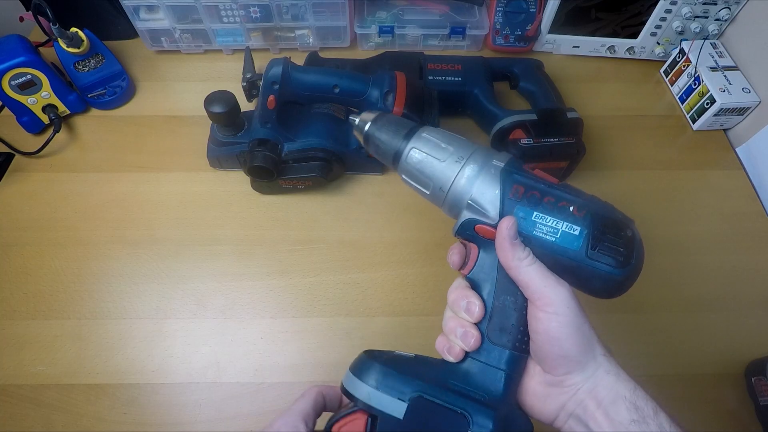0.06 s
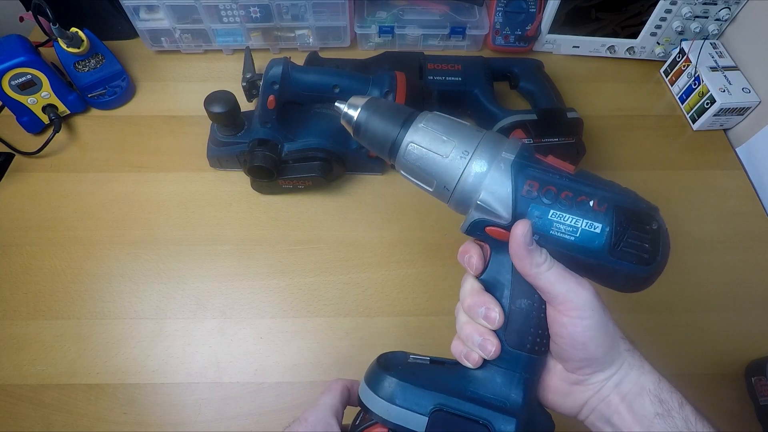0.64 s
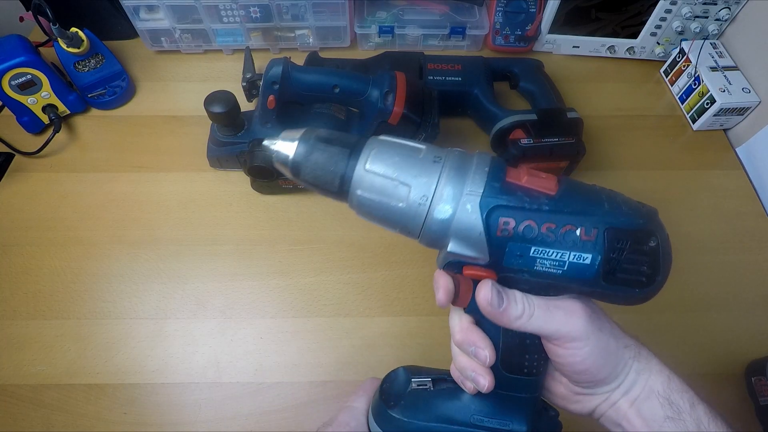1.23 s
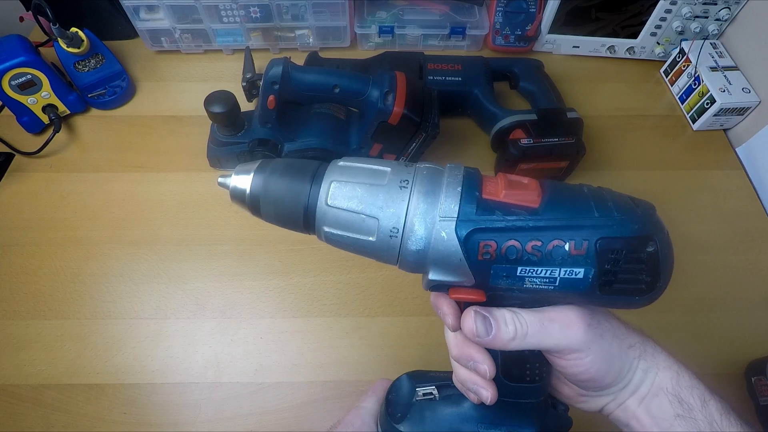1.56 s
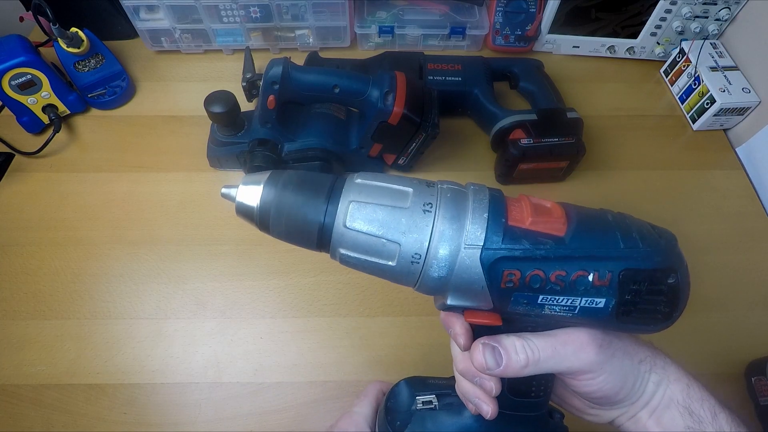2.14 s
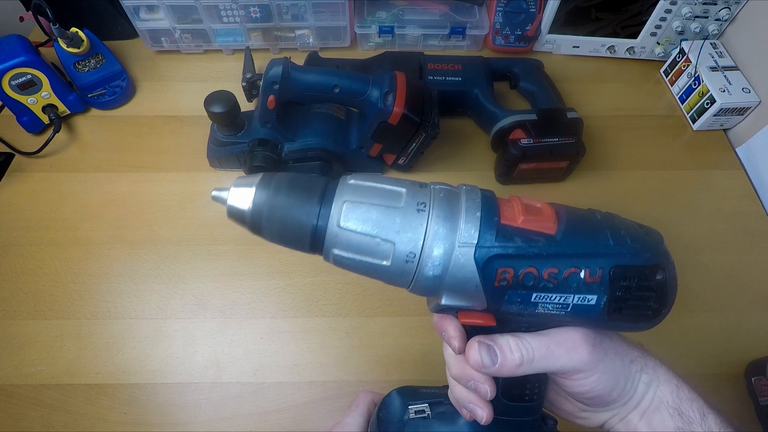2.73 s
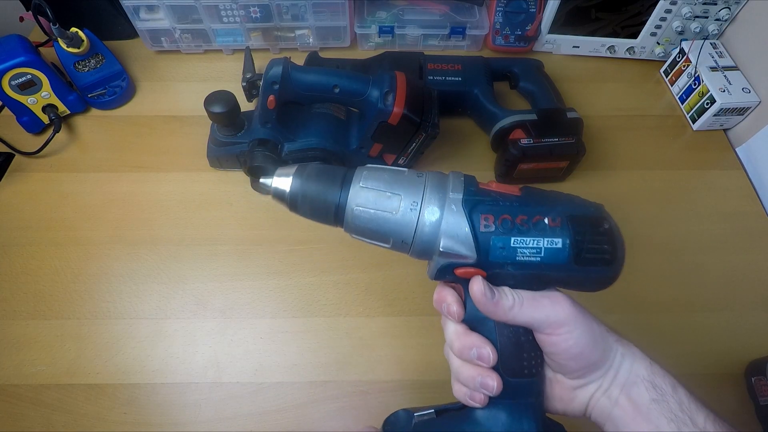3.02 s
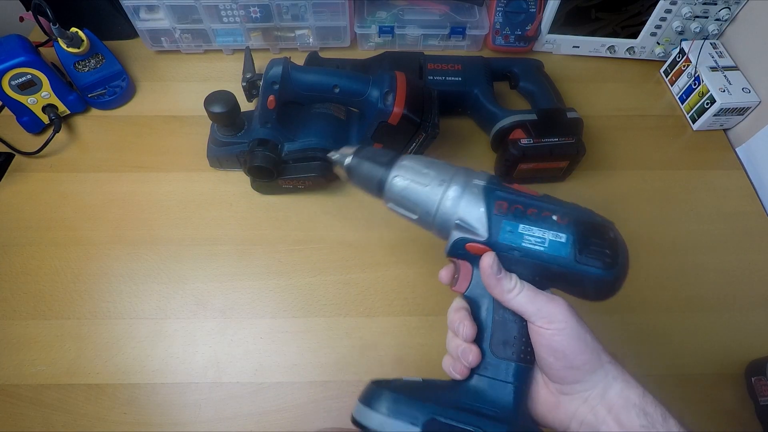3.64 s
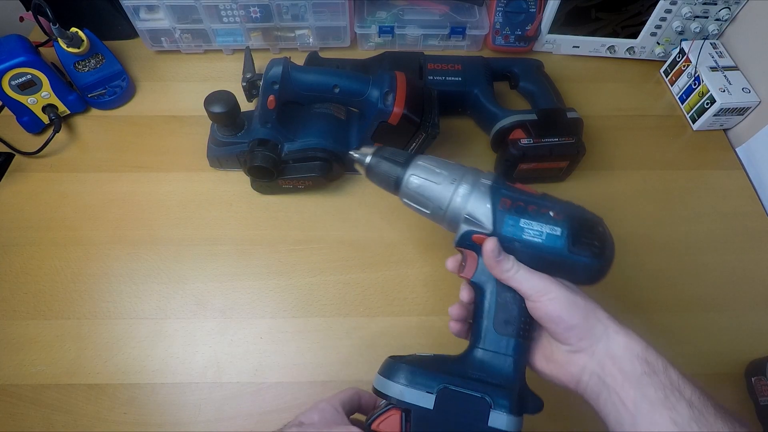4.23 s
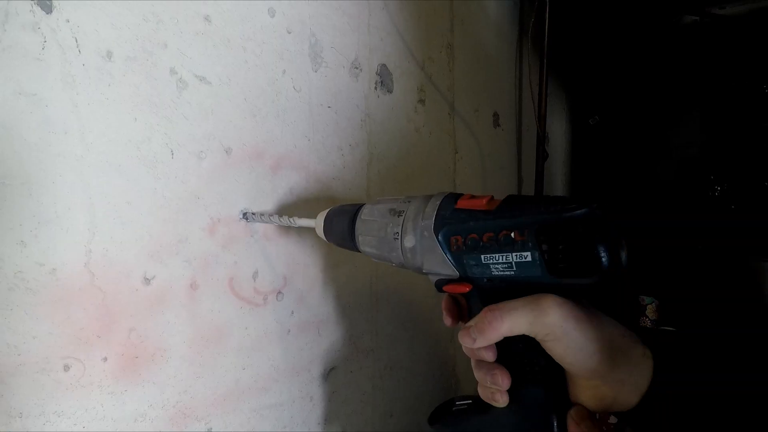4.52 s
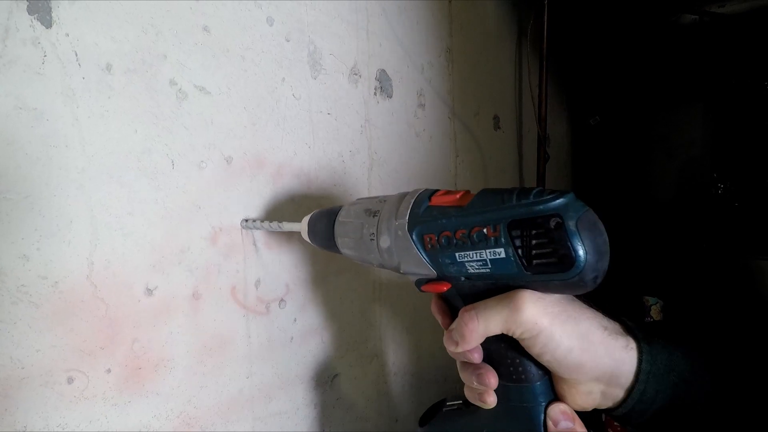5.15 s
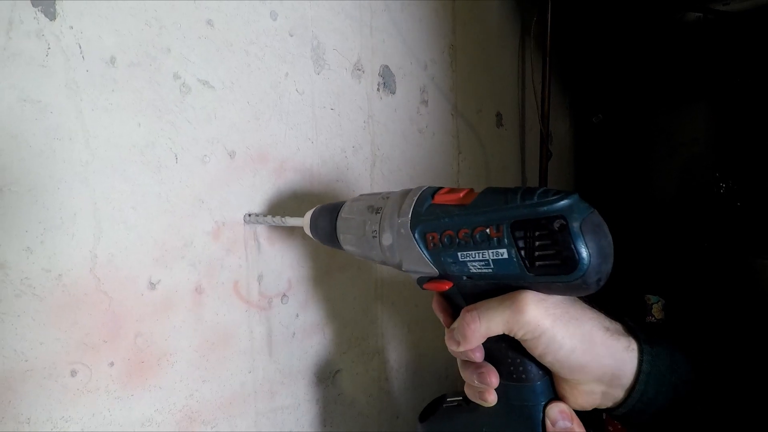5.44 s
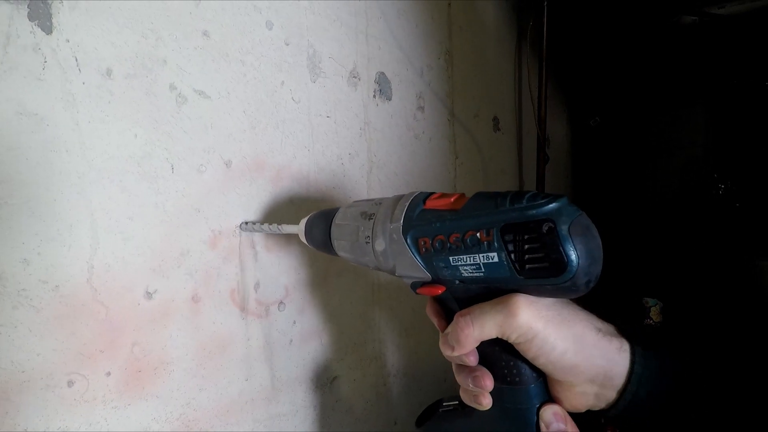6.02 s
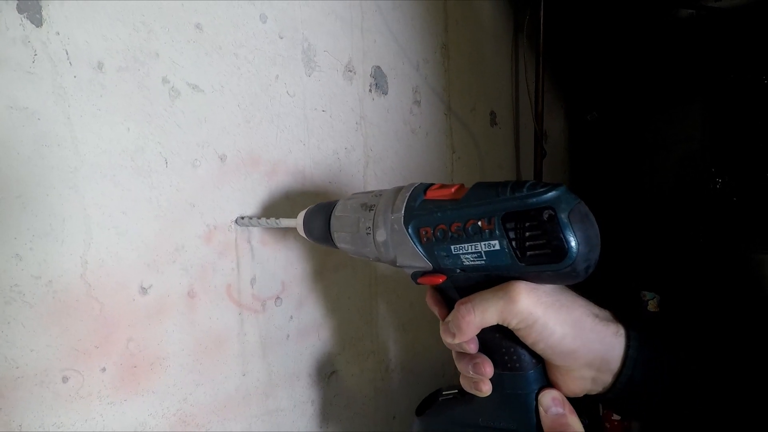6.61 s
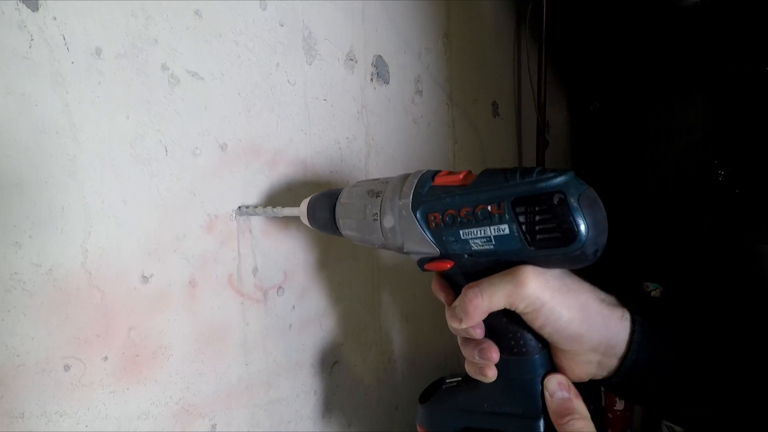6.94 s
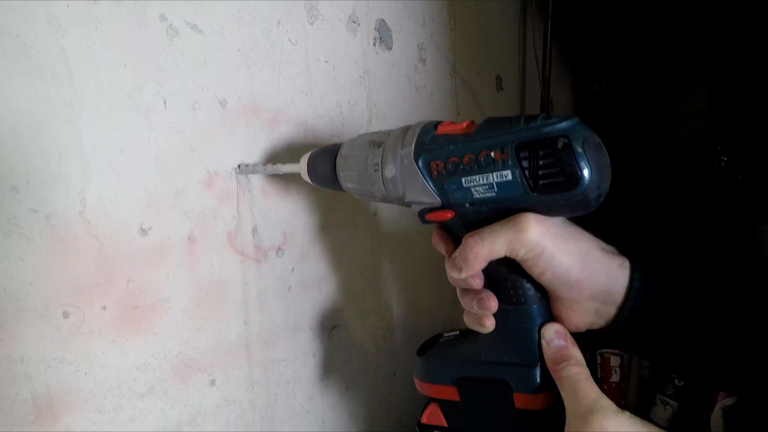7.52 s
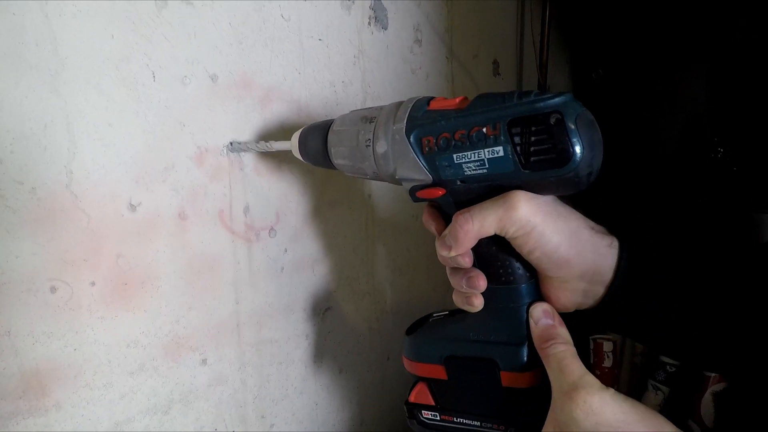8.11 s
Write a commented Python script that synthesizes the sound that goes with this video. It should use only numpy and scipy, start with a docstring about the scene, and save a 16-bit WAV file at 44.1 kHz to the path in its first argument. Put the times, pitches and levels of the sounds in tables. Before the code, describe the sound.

In a small workshop, a cordless drill runs free twice, clacking to a stop, then bores into concrete in hammer mode.

```python
"""A cordless drill growls at a crawl, whines upward as the trigger is squeezed, and brakes with a clack.
It runs free again, long and at full speed: gear teeth rattle, and shaft harmonics sweep through the
housing's resonances. Fingers shift on the grip. Then it bores into concrete in hammer mode: a ratchet
pounds the bit, grit grinds, and the cutting edges squeak by stick-slip up to twice a turn.
The fan's draught buffets the microphone, and a small workshop reverberates."""
import sys
import numpy as np
from scipy import signal
from scipy.fft import rfft, irfft
from scipy.io import wavfile
from scipy.ndimage import uniform_filter1d

SR = 44100
rng = np.random.default_rng(int(sys.argv[2]) if len(sys.argv) > 2 else 0)


def wav_out(sig):
    """Save sig, one row per channel (or a flat mono array), as 16-bit PCM at SR to the path in sys.argv[1]."""
    wavfile.write(sys.argv[1], SR, np.round(np.clip(np.atleast_2d(sig).T, -1, 1) * 32767).astype(np.int16))


N = 364689
TIME = np.arange(N) / SR
FULL_SPEED_HZ, MESH_ORDER = 315, 5  # shaft turns per s, tooth meshings per turn
WALL_S, SEATED_S = 4.432, 4.635  # the drill is at the wall; the bit is seated


def amp(db):
    return 10 ** (np.asarray(db) / 20)

def unit(x):
    return x / np.sqrt(np.mean(x ** 2) + 1e-20)

def curve(rows, column=1, outside=None):
    """Linear interpolation of one column of a time table at every sample."""
    rows = np.array(rows)
    return np.interp(TIME, rows[:, 0], rows[:, column], outside, outside)

def at_frequency(points, hz):
    """Interpolation of a table on a log-frequency axis."""
    f, value = np.transpose(points)
    return np.interp(np.log(hz + 1), np.log(f + 1), value)

def add(mix, s, sound):
    """Superposition of a sound from time s on."""
    part = mix[max(round(s * SR), 0):][:len(sound)]
    part += sound[:len(part)]

def wander(hz):
    """Band-limited random fluctuation of rms 1, up to about hz."""
    knots = rng.standard_normal(int(N / SR * hz * 2) + 2)
    smooth = signal.resample(knots, len(knots) * 8)
    return unit(np.interp(TIME * hz * 16, np.arange(len(smooth)), smooth))

def grains(per_s):
    """Shot noise: dense tiny impacts of random size."""
    return unit(rng.standard_normal(N) * (rng.random(N) < per_s / SR))

def resonance_db(resonances, hz):
    """Resonance: bell-shaped peaks and dips, summed in dB."""
    return sum(db / (1 + (2 * (hz - f) / width) ** 2) for f, width, db in resonances)

def colour(x, spectrum, resonances=()):
    """A body as a minimum-phase filter of unit energy: a broad spectrum lifted by resonances."""
    hz = abs(np.fft.fftfreq(4096, 1 / SR))
    gain = amp(at_frequency(spectrum, hz) + resonance_db(resonances, hz))
    response = np.exp(np.conj(signal.hilbert(np.log(gain))))
    taps = np.fft.ifft(response).real[:2048]
    return signal.oaconvolve(x, taps / np.linalg.norm(taps))[:N]


# Free runs: trigger closes t/s, pulled home t/s, let go t/s, chuck at rest t/s, top speed f/Hz,
# coasting chuck level/dB
FREE_RUNS = [(0.0, 0.455, 0.886, 1.114, 306.5, -59.5), (1.247, 1.284, 3.322, 3.54, 310, -65)]
# Shaft speed with the trigger feathered: t/s, f/Hz
FEATHERED_SPEED = [(0, 50), (0.1, 60), (0.17, 110), (0.3, 112), (0.37, 126), (0.44, 159), (0.56, 193)]
# Shaft speed while the bit is being seated: t/s, f/Hz
SEATING_SPEED = [(4.43, 76), (4.5, 101), (4.62, 76), (4.67, 110)]
# Ratchet blow rate, which sets the shaft speed under load: t/s, f/Hz
BLOW_RATE = [(4.735, 41.82), (4.8, 57.32), (4.97, 64.82), (5.1, 64.8), (5.55, 62.71), (6.25, 63.02),
             (6.85, 62.08), (7.35, 62.4), (7.7, 63.22), (8.25, 63.06)]

def motor():
    """Inertia: free speed rises and falls exponentially. Returns speed in Hz and where current flows."""
    spin_up_s, brake_s, crawl_hz, warming_hz_per_s, turns_per_blow = 0.105, 0.074, 45, 4.5, 4.46
    speed, powered = np.zeros(N), TIME > WALL_S
    feathered = np.maximum(curve(FEATHERED_SPEED, outside=0), crawl_hz)
    for closes, pulled, let_go, _, top, _ in FREE_RUNS:
        held = np.maximum(np.minimum(TIME, let_go) - pulled, 0)
        driven = (top + warming_hz_per_s * held) * (1 - np.exp(-held / spin_up_s))
        braking = np.exp(-np.maximum(TIME - let_go, 0) / brake_s)
        speed = np.where(TIME >= closes, np.maximum(driven, feathered) * braking, speed)
        powered = powered | ((TIME >= closes) & (TIME < let_go))
    loaded = curve(SEATING_SPEED + [(s, rate * turns_per_blow) for s, rate in BLOW_RATE])
    return np.where(TIME > WALL_S, loaded, speed), powered


# Rattle spectra at a crawl, at low speed and at high speed: f/Hz, level/dB
GEARS_CRAWL = [(120, -45), (200, -28), (421, -5.5), (1190, -4), (1320, -2), (2280, -10), (3530, -1.5),
               (4240, -8.5), (9960, -23), (11100, -19), (15400, -20)]
GEARS_SLOW = [(150, -34.5), (300, -23), (480, -17.5), (600, -14), (1000, -15), (1450, -10.5), (2100, -16.5),
              (3400, -9.5), (4400, -11.5), (5100, -15), (7000, -15.5), (8600, -7.5), (9900, -19),
              (11700, -14), (15400, -24.5)]
GEARS_FAST = [(35, -61), (60, -20.5), (129, -32), (259, -24), (312, -18), (485, -14), (626, -8.5),
              (753, -9.5), (1580, -6), (2460, -7.5), (3490, -6.5), (6830, -8.5), (8820, -12),
              (14400, -10.5), (15400, -15.5)]
# Gearbox resonances: f/Hz, width/Hz, gain/dB
GEARBOX_MODES = [(1380, 270, 4.5), (3550, 350, 3), (8760, 1520, 8.5), (12300, 500, 3.5)]

def gear_rattle(speed, turns, powered):
    """Amplitude modulation: tooth and brush noise pulses with the shaft; speed sets level and colour."""
    teeth_db, braking_db, brush_db, coast_fade_s = -38, 3, -53.5, 0.017
    distance_db, load_db = -6.5, -2  # farther off at the wall, then damped by the load
    teeth = amp(teeth_db + braking_db * ~powered) * (speed / FULL_SPEED_HZ) ** 1.3
    level = np.hypot(teeth, amp(brush_db) * powered)
    for _, _, let_go, at_rest, _, coast_db in FREE_RUNS:
        coasting = (TIME > let_go) * np.exp(-np.maximum(TIME - at_rest, 0) / coast_fade_s)
        level = np.hypot(level, amp(coast_db) * coasting)
    level *= amp(distance_db * (TIME > WALL_S) + load_db * (TIME > SEATED_S))
    angle = 2 * np.pi * turns
    pulsing = 1 + 0.15 * np.cos(angle) + 0.16 * np.cos(angle * MESH_ORDER) + 0.086 * wander(90)
    rattle = rng.standard_normal(N) * pulsing
    moving = np.clip((speed - 65) / 50, 0, 1)
    fast = np.clip((speed - 150) / 140, 0, 1)
    slow_rattle = (1 - moving) * colour(rattle, GEARS_CRAWL) + moving * colour(rattle, GEARS_SLOW)
    return level * ((1 - fast) * slow_rattle + fast * colour(rattle, GEARS_FAST, GEARBOX_MODES))


# Armature and fan partials at full speed: shaft order, level/dB
SHAFT_PARTIALS = [(1, -66), (4, -58), (6, -62), (7, -59), (9, -61.5), (13, -56.5), (18, -59), (23, -62.5),
                  (25, -55.5), (28, -59.5), (29, -57), (30, -55.5), (34, -65.5), (40, -61.5)]
# Gear-mesh partials at full speed: mesh harmonic, level/dB, share of the sway, exponent of speed
MESH_PARTIALS = [(1, -45.5, 1.0, 2.07), (2, -51.5, -0.8, 2.8), (3, -49, 0.3, 3.1), (4, -46.5, -0.25, 6.5)]
# Sway as the drill turns in the hand: t/s, mesh gain/dB, hum gain/dB
SWAY = [(0.6, 0.5, -5), (0.8, 3.5, -1), (1.45, 1, -2), (1.66, -0.5, 2.5), (1.9, 3.5, -1), (2.3, -1, 0),
        (2.66, -1, 0), (2.85, -8.5, 2), (3.03, 0.5, -4), (3.3, 0.5, -7)]
# Housing resonances and dips: f/Hz, width/Hz, gain/dB
HOUSING_MODES = [(562, 190, 12), (1410, 200, 4), (2730, 400, 3.5), (3760, 450, 6.5), (4500, 350, -7),
                 (5400, 450, -1.5), (6010, 1100, 13.5), (8740, 800, 14.5)]

def whine(speed, turns):
    """Forced vibration: shaft harmonics grow with speed and flare as they cross housing resonances."""
    distance_db, load_db, hop = -6, -6.5, 64
    partials = [(order, db, 1.78) for order, db in SHAFT_PARTIALS]  # order, level/dB, exponent of speed
    partials += [(2, -51 + curve(SWAY, 2), 3.7)]  # armature hum
    partials += [(MESH_ORDER * k, db + share * curve(SWAY), exponent)
                 for k, db, share, exponent in MESH_PARTIALS]
    slow, quick, out = wander(5), wander(70), np.zeros(N)
    shaft_hz = speed[::hop]
    for order, db, exponent in partials:
        flare_db = resonance_db(HOUSING_MODES, order * shaft_hz)
        flare_db -= resonance_db(HOUSING_MODES, order * FULL_SPEED_HZ)
        growth = amp(flare_db) * (shaft_hz / FULL_SPEED_HZ) ** exponent
        level = amp(db) * np.repeat(growth, hop)[:N]
        shifts = rng.integers(0, N, 3)
        waver = 1 + 0.15 * order / (order + 6) * np.roll(slow, shifts[0])
        waver += 0.11 * np.roll(quick, shifts[1])
        backlash = (0.13 + 0.0069 * order) * np.roll(quick, shifts[2])
        out += level * waver * np.sqrt(2) * np.sin(2 * np.pi * order * turns + backlash + shifts[0])
    return out * amp(distance_db * (TIME > WALL_S) + load_db * (TIME > SEATED_S))


# Spectrum of the workshop's background: f/Hz, level/dB
ROOM_TONE = [(20, -1), (35, -8.5), (90, -9.5), (160, -13), (560, -17), (1140, -26.5), (4500, -30.5),
             (8700, -33.5), (11000, -29.5), (15400, -39)]

def room_tone():
    """Stationary background: coloured noise and a pure tone of mains hum."""
    hum = amp(-81.5) * np.sqrt(2) * np.sin(2 * np.pi * 59.5 * TIME)
    return amp(-81) * colour(rng.standard_normal(N), ROOM_TONE) + hum


# The fan's jet hits the microphone squarely: centre t/s, duration/s, level/dB
GUSTS = [(1.53, 0.22, -48), (5.0, 0.64, -40), (5.683, 0.18, -45), (6.4, 0.39, -48), (6.73, 0.16, -35.5),
         (7.16, 0.36, -37), (7.89, 0.59, -45)]

def fan_draught(speed):
    """Turbulence: low-frequency pressure fluctuations grow with fan speed and swell in gusts."""
    free_db, wall_db, still_air_db, swing_db = -61.5, -49.5, -75.5, 4
    hz = np.fft.rfftfreq(N, 1 / SR)
    buffeting = unit(irfft(rfft(rng.standard_normal(N)) / (1 + (hz / 8) ** 2.5) * (hz > 2), N))
    draught_db = np.where(TIME > WALL_S, wall_db, free_db) + swing_db * wander(3)
    draught = amp(draught_db) * speed / FULL_SPEED_HZ
    for s, length, db in GUSTS:
        add(draught, s - length / 2, amp(db) * np.hanning(int(length * SR)))
    return (amp(still_air_db) + draught) * buffeting


SQUEAL_S = 0.04

def squeal(hz, fall, rough):
    """Stick-slip oscillation: a short, jittery tone that sags in pitch."""
    ramp = np.linspace(-1, 1, int(SQUEAL_S * SR))
    jitter = unit(uniform_filter1d(rng.standard_normal(len(ramp)), 40))
    pitch = hz * (1 - fall * ramp + rough * jitter)
    return np.hanning(len(ramp)) * 2 * np.sin(2 * np.pi * np.cumsum(pitch) / SR)


# Chirps of the motor's brushes: t/s, level/dB
BRUSH_CHIRPS = [(0.02, -57.5), (0.09, -55), (0.305, -54), (0.361, -51), (1.28, -52), (1.325, -50),
                (4.482, -54), (4.513, -57), (4.653, -51.5)]

def brush_chatter():
    """Stick-slip friction: the brushes chatter while the motor turns slowly."""
    out = np.zeros(N)
    for s, db in BRUSH_CHIRPS:
        add(out, s - SQUEAL_S / 2, amp(db) * squeal(hz=3410, fall=0.05, rough=0.16))
    return out


# Clacks of trigger, brake and spindle lock, and of the bit meeting the wall:
# t/s, level/dB, T60/s, strength of the first tick (0-1)
CLACKS = [(0.046, -29.5, 0.034, 0), (0.884, -27, .046, 0.1), (0.902, -18.5, 0.042, 0.1),
          (0.981, -20.5, 0.071, 0.55), (1.021, -28, 0.056, 0.3), (1.028, -23, 0.065, 0.1),
          (1.101, -39.5, 0.063, 0.2), (1.248, -34, 0.025, 0.2), (3.322, -23, 0.072, 0.75),
          (3.39, -23.5, 0.041, 0), (3.411, -22, .04, 0.26), (3.42, -25.5, 0.12, 0.2),
          (3.489, -26.5, 0.067, 0.4), (4.433, -48, .05, .1), (4.626, -33, 0.077, .2), (4.648, -31, .03, .1),
          (4.667, -28, 0.044, 0)]
# Spectrum of a clack: f/Hz, level/dB
CLACK_SPECTRUM = [(88, -42.5), (150, -21), (582, -3), (1900, -10.5), (2130, -2), (2350, -3.5),
                  (6080, -10.5), (8120, -12), (10100, -16.5), (12900, -6.5), (15400, -16.5)]

def clacks():
    """Impact excitation: hard parts strike with a tick, 4 ms of chatter and an exponential ring-down."""
    out, t = np.zeros(N), np.arange(SR // 5) / SR
    for s, db, t60, tick in CLACKS:
        ring_down = amp(-60 * np.maximum(t - 0.004, 0) / t60)
        rattle = 0.15 * rng.standard_normal(len(t)) * ring_down
        rattle[0] += 4 * tick
        add(out, s, amp(db) * rattle)
    return colour(out, CLACK_SPECTRUM, GEARBOX_MODES)


# Finger knocks: t/s, level/dB, T60/s
FINGER_KNOCKS = [(3.737, -72, .03), (3.858, -75, .09), (3.905, -63, 0.028), (3.914, -62, .025),
                 (3.922, -69, 0.055), (3.973, -63, 0.04), (4.017, -78, .04), (4.26, -83, 0.11)]
# Rub of the palm: t/s, level/dB
PALM_RUB = [(3.55, -90), (3.8, -83.5), (3.92, -78.5), (4.08, -89.5), (4.2, -100)]
# Response of the plastic grip: f/Hz, level/dB
GRIP_SPECTRUM = [(150, -19.5), (600, 0), (1300, -2), (3000, -3), (6000, -8), (8300, -8), (10000, -16),
                 (15000, -19)]

def handling():
    """Damped impacts and sliding friction: the hand shifts on the plastic grip."""
    knocks, t = np.zeros(N), np.arange(SR // 5) / SR
    for s, db, t60 in FINGER_KNOCKS:
        add(knocks, s, amp(db) * rng.standard_normal(len(t)) * amp(-60 * t / t60))
    rub = amp(curve(PALM_RUB, outside=-200)) * grains(4000)
    return colour(knocks + rub, GRIP_SPECTRUM)


BLOW_TIME = np.arange(SR // 40) / SR

def tooth_train(cycles, delay_s, jitter_s, spread_db):
    """A quasi-periodic impulse train: one impulse a ratchet tooth, uneven in time and size."""
    starts = np.flatnonzero(np.diff(np.ceil(cycles)) > 0)
    late, size = rng.standard_normal((2, N))[:, :len(starts)]
    arrivals = starts + (delay_s + jitter_s * late) * SR
    out = np.zeros(N)
    out[np.clip(arrivals, 0, N - 1).astype(int)] = amp(spread_db * size)
    return out

def swell(hits, rise_s, decay_s):
    """Convolution gives each impulse an envelope of grit that rises and decays."""
    envelope = (1 - np.exp(-BLOW_TIME / rise_s)) * np.exp(-BLOW_TIME / decay_s)
    return unit(signal.oaconvolve(hits, envelope)[:N])


# Spectrum of grinding concrete: f/Hz, level/dB
GRIND_SPECTRUM = [(150, -13), (600, -4.5), (1350, -2.5), (2000, -1), (3100, 0.5), (5200, 4.5), (6600, -1),
                  (7800, 2), (9000, -1), (10400, -25), (12200, 0.5), (13600, -7), (15400, -22)]
# Resonances of bit and spindle: f/Hz, width/Hz, gain/dB
BIT_MODES = [(736, 270, 4.5), (1323, 250, 4.5), (3085, 150, 5)]

def grinding(blows, rebounds, slips):
    """Abrasion: continuous shot noise from grit surges at each slip, blow and rebound."""
    scrape = 1.86 + 0.5 * swell(blows, rise_s=0.00053, decay_s=0.0021)
    scrape += 0.33 * swell(slips, rise_s=0.00033, decay_s=0.0016)
    scrape += 0.077 * swell(rebounds, rise_s=0.00039, decay_s=0.0013)
    grit = unit(grains(16000) * scrape * amp(0.31 * wander(45)))
    return colour(grit, GRIND_SPECTRUM, BIT_MODES)


# Spectrum of a hammer blow: f/Hz, level/dB
BLOW_SPECTRUM = [(300, -20.5), (450, -12), (580, -5.5), (800, -2), (1000, -2), (1350, 0.5), (1900, -4.5),
                 (3000, 1.5), (3500, -1.5), (6500, -26), (8700, -2), (10500, -11), (15000, -8)]

def bit_impacts(blows, rebounds):
    """Impulse response: spindle and chuck spread each blow into the same short rattle; grit crunches."""
    rattle = rng.standard_normal(len(BLOW_TIME)) * BLOW_TIME * np.exp(-BLOW_TIME / 0.0012)
    flat_rattle = irfft(np.exp(1j * np.angle(rfft(rattle))))
    knocks = unit(signal.oaconvolve(blows, flat_rattle)[:N])
    crushing = swell(blows, rise_s=0.0012, decay_s=0.0037)
    crushing += 0.19 * swell(rebounds, rise_s=0.0005, decay_s=0.0022)
    crunch = unit(grains(20000) * crushing)
    impact = colour(0.81 * knocks + 0.49 * crunch, BLOW_SPECTRUM, BIT_MODES)
    # keep only the blow's bright crack; the body's buzz supplies the bass
    return signal.sosfilt(signal.butter(6, 450, "high", fs=SR, output="sos"), impact)


# Recoil of the tool's body: harmonic of the blow rate, level/dB
RECOIL_HARMONICS = [(1, -30.5), (2, -24), (3, -22), (4, -24.5), (5, -27.5), (6, -27.5), (7, -28.5),
                    (8, -32)]

def recoil(cycles):
    """Periodic reaction force: the body buzzes in slightly unsteady harmonics of the blow rate."""
    buzz = np.zeros(N)
    for order, db in RECOIL_HARMONICS:
        level = amp(db) * (1 + 0.13 * wander(20))
        buzz += level * np.sqrt(2) * np.cos(2 * np.pi * (order * cycles + rng.random()))
    return buzz

def hammer(cycles):
    """Repeated impact: each ratchet tooth slips off, slams the bit into the wall and rebounds."""
    contact_s, rise_s, push_db, bite_blows = 4.69, 0.013, -37, 1.9
    blows = tooth_train(cycles, delay_s=0.0003, jitter_s=0.00008, spread_db=1.03)
    rebounds = tooth_train(cycles, delay_s=0.005, jitter_s=0.0004, spread_db=3.0)
    slips = tooth_train(cycles, delay_s=-0.00326, jitter_s=0.0003, spread_db=4.5)
    impact = amp(-7) * bit_impacts(blows, rebounds)
    grind = amp(-5) * grinding(blows, rebounds, slips)
    bite = np.clip(cycles / bite_blows, 0, 1)
    push = amp(push_db) * np.clip((TIME - contact_s) / rise_s, 0, 1)
    return push * (bite * (impact + recoil(cycles)) + grind)


# The bit's two edges: from t/s, until t/s, place in the turn/blows, level/dB, f/Hz, relative pitch fall
CUTTING_EDGES = [(5.1, 8.0, 5.8, -43.5, 4660, 0.055), (5.8, 7.7, 11.8, -45.5, 4370, 0.015)]

def bit_squeaks(cycles):
    """Stick-slip friction: each cutting edge catches at the same spot of every turn."""
    blows_per_turn, spread_db, pitch_spread = 12, 2, 0.016
    out = np.zeros(N)
    for first, last, place, db, hz, fall in CUTTING_EDGES:
        catches = TIME[1:][np.diff((cycles - place) // blows_per_turn) > 0]
        for s, (size, detune) in zip(catches, rng.standard_normal((len(catches), 2))):
            if first < s < last:
                tone = squeal(hz * (1 + pitch_spread * detune), fall, rough=0.031)
                add(out, s - SQUEAL_S / 2, amp(db + spread_db * size) * tone)
    return out


# Reverberation time of the workshop: f/Hz, T60/s
ROOM_T60 = [(150, 0.5), (1000, 0.29), (4000, 0.27), (12000, 0.3)]

def room(x, wet_db):
    """Reverberation: sparse reflections decay exponentially, the bass most slowly."""
    taps = rng.standard_normal(SR // 2) * (rng.random(SR // 2) < 0.1)
    taps[:SR // 300] = 0  # gap before the first reflection
    hz, t, spectra = signal.stft(taps, SR, nperseg=256)
    decay = amp(-60 * t / at_frequency(ROOM_T60, hz)[:, None])
    tail = signal.istft(spectra * decay, SR, nperseg=256)[1]
    return x + amp(wet_db) * signal.oaconvolve(x, tail / np.linalg.norm(tail))[:N]

def scene():
    """Superposition of drill, wall and air, the same in both channels."""
    speed, powered = motor()
    hammering = TIME >= BLOW_RATE[0][0]
    unrest = 0.00071 * wander(25) + 0.02 * wander(12) * hammering  # the shaft stumbles under load
    turns = np.cumsum(speed * (1 + unrest)) / SR
    cycles = np.cumsum(curve(BLOW_RATE) * hammering) / SR  # ratchet blows so far
    rattles = gear_rattle(speed, turns, powered) + clacks() + handling()
    drill = room(rattles, wet_db=-12.5) + whine(speed, turns)
    pounding = hammer(cycles)
    friction = (bit_squeaks(cycles) + brush_chatter()) * (1 + 0.3 * wander(120))
    mono = drill + room(pounding + friction, wet_db=-15) + room_tone() + fan_draught(speed)
    return np.array([mono, mono])

def record(dry):
    """Band limiting: a linear-phase low-pass at 15450 Hz."""
    low_pass = signal.firwin(511, 15450, window=("kaiser", 9), fs=SR)
    return signal.oaconvolve(dry, low_pass[None], "same")


dry = scene()
out = record(dry)
wav_out(out)
```